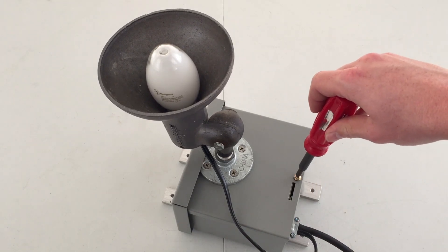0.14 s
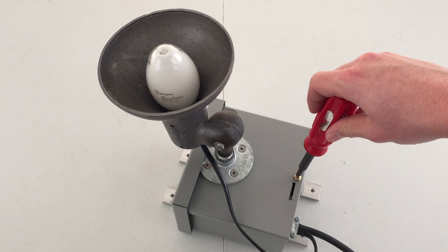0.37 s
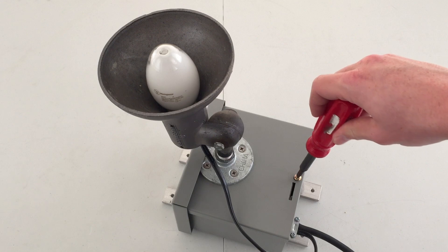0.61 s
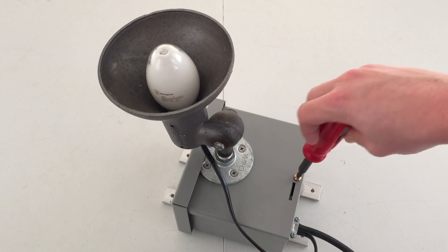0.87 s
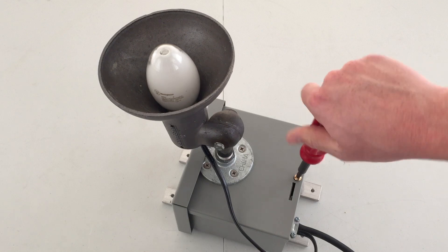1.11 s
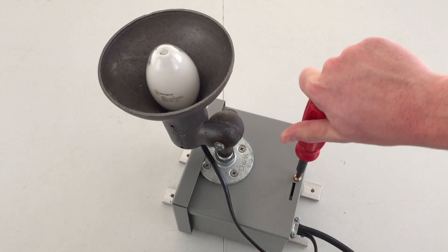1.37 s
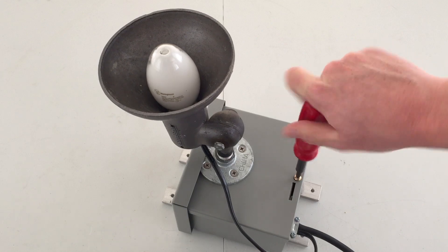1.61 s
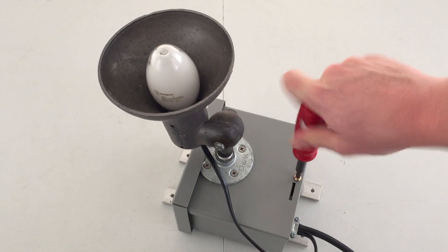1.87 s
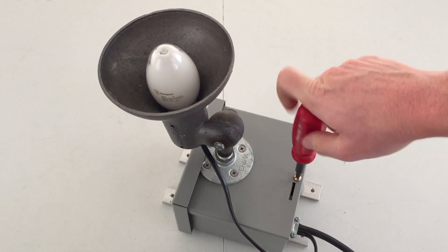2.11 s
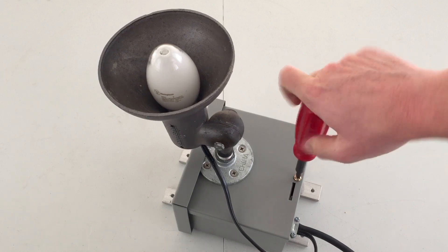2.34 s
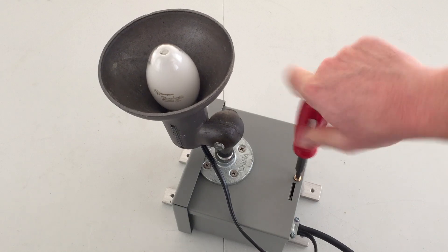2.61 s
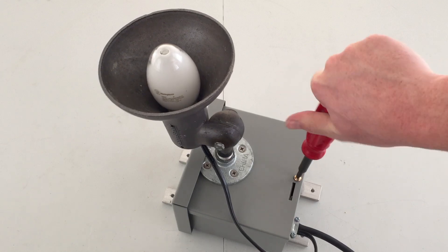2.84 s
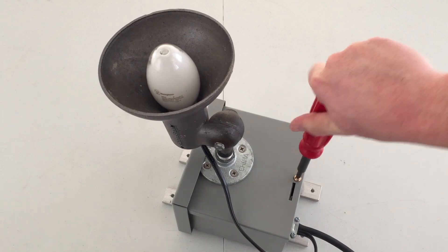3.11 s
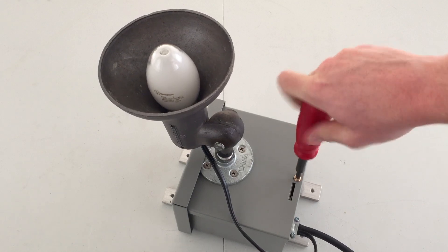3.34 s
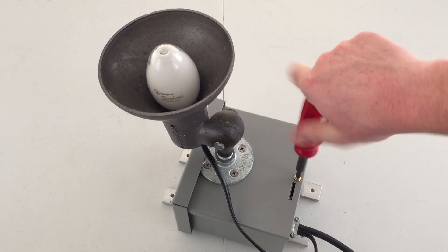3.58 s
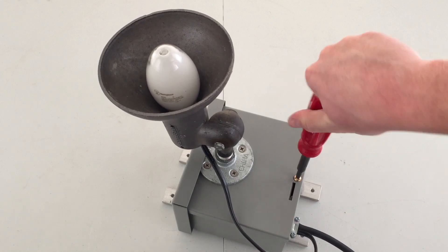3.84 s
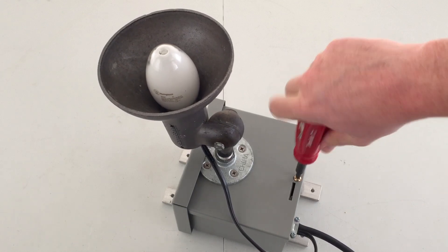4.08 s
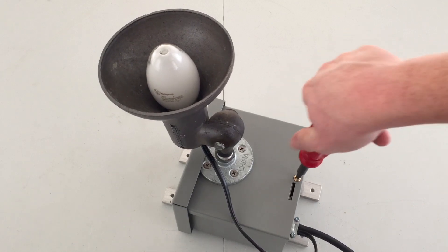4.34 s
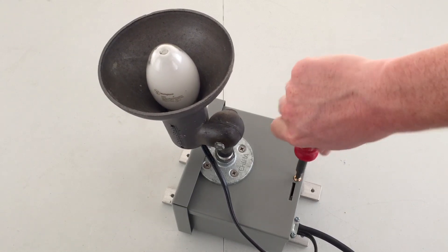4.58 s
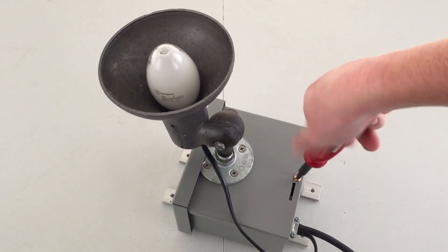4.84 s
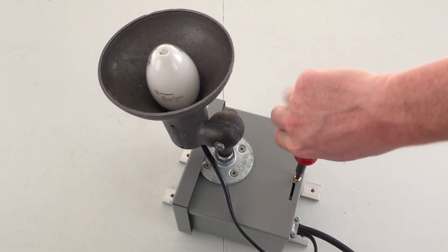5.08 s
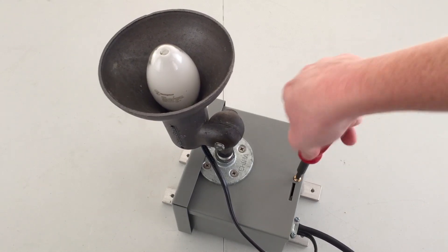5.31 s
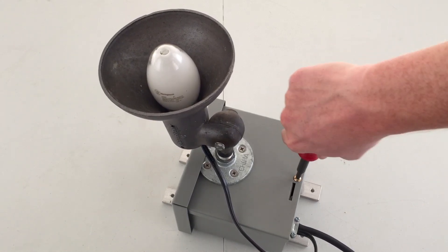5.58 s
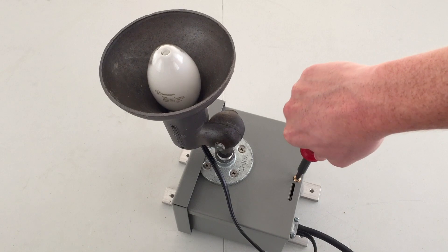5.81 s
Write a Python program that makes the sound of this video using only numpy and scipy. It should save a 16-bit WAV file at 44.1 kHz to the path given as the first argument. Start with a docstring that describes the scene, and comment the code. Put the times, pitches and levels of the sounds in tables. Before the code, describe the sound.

Close metallic ticks and dull knocks from a screwdriver blade ring a metal box briefly; one sharp clack stands out midway over soft handling rumble.

```python
"""A screwdriver turns a screw in the cover of a sheet-metal box on a table, close to a small microphone.
The blade's knocks are bursts of tiny contacts that ring the box's modes and a dense, dying noise tail;
the thread grinds as grains that drive the same modes. The hand's push shakes box, cover and table top
through low resonances, its lean sways the table as deep noise, and fingers slide on the handle as grainy
hiss. Below lies the tone of a quiet hard-walled room, low hum and microphone hiss, as banded noise."""
import sys
import numpy as np
from scipy import signal
from scipy.fft import rfft
from scipy.io import wavfile

SR = 44100
rng = np.random.default_rng(int(sys.argv[2]) if len(sys.argv) > 2 else 0)


def transcribe(u):
    """Save the signal u as a 16-bit wav file named by the first command-line argument.

    u: samples, shape (n,) or (channels, n), limited to [-1, 1]; the rate is SR.
    q: integer samples, one column per channel.
    """
    v = np.clip(np.atleast_2d(u).T, -1, 1)
    q = np.round(v * 32767).astype(np.int16)
    wavfile.write(sys.argv[1], SR, q)


def field_ratio(decibels):
    """Amplitude ratio for a level in dB (20 dB per decade); scalars and array-likes work."""
    return 10 ** (np.asarray(decibels, dtype=float) / 20)


N = 262086

# Colour of the room tone. Each row: frequency in Hz, relative level in dB per Hz.
ROOM_COLOUR = [(18, -37), (30, -7.5), (199, -2), (259, -13.5), (404, 1.5), (486, -22.5), (684, -11),
               (866, -19), (988, -10.5), (1190, -15), (2750, -20.5), (13000, -34.5), (16000, -39.5)]
ROOM_DB = -72   # rms level of the whole room tone

# Resonances of the table top. Each row: frequency in Hz, nominal width in Hz, relative level in dB.
TABLE_TOP_MODES = [(88, 39, -9.5), (121, 18, -4)]
TOP_LEAN_SHARE, TOP_DB = 0.36, 5.5   # share of the lean's dB, the push giving the rest; added dB

# Fingers slip on the handle. Each row: start in seconds, hold in seconds, relative level in dB,
# pitch of the hiss in Hz.
FINGER_SLIPS = [(0.69, 0.066, -71, 9000), (1.096, .03, -85, 9500), (1.41, .02, -82, 9000),
                (1.71, 0.019, -72.5, 11700), (1.958, .02, -80, 12400), (2.252, 0.043, -80, 8700),
                (2.504, 0.037, -87, 8960), (2.574, 0.009, -71, 9400), (2.693, 0.0048, -64, 13900),
                (2.864, 0.006, -69.5, 13800), (3.135, .02, -78, 12000), (3.45, .02, -77.5, 12000),
                (3.552, 0.12, -72.5, 8000), (3.842, 0.014, -71, 12000), (3.9, 0.024, -74.5, 6900),
                (4.027, .03, -85.5, 9040), (4.292, .02, -81, 9000), (4.397, .01, -74.5, 12000),
                (4.475, .01, -81, 12500), (4.767, 0.053, -85.5, 10200), (5.22, .11, -86, 8800)]
SLIP_RISE_DB_PER_S, SLIP_FALL_DB_PER_S = 1496.5, 702
SKIN_DB = -95   # resting level of each band between slips
SLIP_DB_PER_OCTAVE = 21   # loss away from the pitch

# The hand between pushes. Each row: time in seconds, relative grip on the handle in dB,
# relative weight on the table in dB.
HAND_REST = [(0.0, -68, -91), (0.96, -59, -81), (1.42, -72.5, -73), (1.85, -65, -77.5),
             (2.28, -66.5, -75.5), (2.84, -63, -65), (3.24, -64, -83), (3.62, -65.5, -74.5),
             (4.8, -65.5, -76.5), (5.94, -59.5, -83)]
GRIP_PUSH_DB, GRIP_FLEX_DB = -1.5, -9   # from the grip to the resting push and flexing

# The hand bears down. Each row: start in seconds, hold in seconds, relative push on the box in dB,
# relative flexing of the cover in dB, relative lean on the table in dB.
HAND_PUSHES = [(0.215, 0.0094, -50, -54, -83), (0.38, 0.018, -71, -62.5, -79),
               (0.672, 0.0055, -48, -49.5, -87), (0.757, 0.033, -59, -75, -83),
               (0.893, 0.017, -44.5, -49, -67), (1.048, 0.018, -54, -71, -69),
               (1.419, 0.013, -55.5, -61.5, -66), (1.682, 0.0067, -46, -51, -69),
               (1.79, 0.017, -61.5, -66, -63), (1.971, 0.051, -54.5, -65, -81),
               (2.571, 0.034, -52.5, -56, -58.5), (2.696, 0.053, -61.5, -75, -65),
               (2.895, 0.042, -43.5, -48.5, -56.5), (2.984, 0.027, -49, -56.5, -63),
               (3.124, .04, -56.5, -63.5, -63), (3.406, 0.052, -55.5, -83, -65),
               (3.509, 0.056, -53.5, -53.5, -64), (3.59, 0.033, -66, -59.5, -60),
               (3.854, 0.019, -51, -53.5, -56.5), (3.889, 0.012, -56.5, -65, -52),
               (3.991, .02, -61.5, -75, -70), (4.18, 0.029, -60.5, -62.5, -77), (4.316, .02, -47, -48, -51),
               (4.376, 0.023, -48, -60, -60), (4.566, 0.037, -63, -56.5, -67),
               (4.763, 0.046, -54.5, -61, -66.5), (4.936, 0.018, -63.5, -74.5, -64),
               (4.98, 0.024, -64, -72, -78), (5.114, 0.019, -47, -56.5, -80.5),
               (5.305, 0.023, -48, -57, -68.5), (5.438, 0.037, -53, -80, -78.5),
               (5.47, 0.013, -50, -47.5, -77), (5.594, 0.029, -58, -68, -77.5),
               (5.705, 0.045, -57, -62, -79.5), (5.876, 0.031, -52.5, -59.5, -81.5)]
PUSH_RISE_DB_PER_S, PUSH_FALL_DB_PER_S, LEAN_LAG_S = 451.5, 263.5, .025

# Low resonances of the box walls. Each row: frequency in Hz, nominal width in Hz, relative level in dB.
WALL_MODES = [(158.8, 8, -4.5), (207.2, 9.7, 1)]

# Low resonances of the cover. Each row: frequency in Hz, nominal width in Hz, relative level in dB.
COVER_MODES = [(297.5, 12, -2.5), (342.7, 30, -8), (405.4, 15, -3), (530, 56, -9)]

# The thread binds, grinds harder and lets go. Each row: letting go in seconds, hold before it in seconds,
# relative level in dB.
THREAD_BINDS = [(0.02, 0.033, -67), (0.653, .012, -57), (0.913, 0.0071, -41), (1.43, .03, -59.5),
                (1.686, .02, -57), (1.88, .015, -72), (2.29, 0.11, -60), (2.512, .015, -63),
                (2.578, 0.0069, -44), (2.89, 0.032, -49), (3.33, 0.045, -70), (3.49, .012, -48.5),
                (3.663, 0.11, -46.5), (3.89, .02, -54), (3.841, 0.035, -54.5), (4.218, .18, -64),
                (4.53, 0.057, -60.5), (4.704, 0.039, -69), (5.142, 0.013, -52.5), (5.94, 0.51, -58.5)]
BIND_RISE_DB_PER_S, BIND_FALL_DB_PER_S = 354.5, 697
THREAD_DB = -69   # relative level of the steady grinding

# Modes of box and cover. Each row: frequency in Hz, relative level in dB, time to fall 60 dB in seconds.
BOX_MODES = [(648, -15, 0.25), (713, -14, 0.22), (763.7, -7.5, 0.24), (816.4, -8, 0.21),
             (877.4, -5.5, 0.12), (924.7, -11.5, 0.13), (1056, -14, 0.24), (1150, -3, 0.15),
             (1255.6, -6.5, 0.18), (1290, -7, 0.13), (1380, -15, 0.35), (1548, -14, 0.24),
             (1690, -11, 0.24), (1851, -13, 0.19), (1960, -12, 0.29), (2164, -4, 0.16), (2330, 0, 0.12),
             (2455, -6, .2), (2578, -7.5, 0.11), (3150, -19, 0.18), (3190, -8.5, 0.14), (3280, -7.5, 0.22),
             (3386, -7, 0.1), (3626, -4.5, 0.3), (3750, -7.5, .13), (4046, -8, 0.31), (4160, -9, 0.12),
             (4190, -15, 0.14), (5270, -7.5, 0.19), (5480, -26.5, .12)]

# The sheet's crowd of small modes and the room's echoes. Each row: frequency in Hz, relative level in dB,
# time to fall 60 dB in seconds.
TAIL_BANDS = [(300, -7, 0.46), (605, -10.5, 0.47), (1030, -15, 0.47), (1722, -8.5, 0.09), (2850, -8, 0.39),
              (4400, -2.5, 0.28), (7360, -6, .22), (13110, -6.5, 0.11)]

# Blade knocks, passed on to the box. Each row: start in seconds, relative levels in dB at 800, 1400 and
# 3000 Hz, pitch that rings most in Hz.
BLADE_KNOCKS = [(0.21, -49.5, -56, -56.5, 838), (0.379, -43.5, -64, -71.5, 2140), (0.4, -64, -72, -82, 780),
                (0.425, -56, -78, -78, 790), (0.651, -58, -46, -55, 1960), (0.659, -36.5, -34, -50, 1290),
                (0.678, -42, -35, -52, 1960), (0.692, -39, -43.5, -62, 1290), (0.71, -44, -50, -58, 755),
                (0.886, -61, -51, -52, 1260), (0.896, -38, -49.5, -49, 1240), (0.908, -43, -42, -51, 2330),
                (1.032, -72, -62, -63, 1960), (1.044, -72, -55.5, -58, 2360), (1.053, -57, -65, -72, 3386),
                (1.272, -51, -72, -89, 870), (1.315, -62, -75, -79, 867), (1.399, -69, -63, -73, 1390),
                (1.674, -55, -74, -60, 1260), (1.719, -50, -56, -61.5, 810), (1.802, -50.5, -61, -75, 762),
                (1.933, -62, -57, -78, 886), (1.987, -56, -67, -69, 800), (2.233, -54, -81, -81, 1160),
                (2.533, -53.5, -77, -73, 880), (2.591, -41, -50, -63, 795), (2.733, -52, -65, -81, 875),
                (2.771, -55.5, -54, -75, 840), (2.794, -43.5, -68, -63, 810), (2.868, -43, -51, -61.5, 820),
                (2.884, -63, -50, -58.5, 754), (2.909, -33, -29, -34, 1960),
                (2.933, -35.5, -36, -47.5, 774), (2.965, -40, -36, -58, 1870), (3.02, -53, -47, -63, 1400),
                (3.089, -46, -52, -67, 724), (3.154, -47.5, -56.5, -72, 796),
                (3.509, -24.5, -23.5, -25.5, 3220), (3.516, -32, -31.5, -29.5, 4046),
                (3.833, -32.5, -34.5, -46.5, 1430), (3.899, -60.5, -72, -66, 783),
                (4.079, -59, -57, -88.5, 1370), (4.178, -40.5, -41.5, -53, 1010),
                (4.222, -43, -47.5, -61.5, 1110), (4.244, -54.5, -54, -59.5, 764),
                (4.306, -46, -59, -72, 713), (4.317, -38.5, -48.5, -66.5, 934),
                (4.344, -50, -58, -80, 1153), (4.373, -61, -54, -70, 626), (4.563, -51, -56, -69, 830),
                (4.58, -42, -50, -52, 910), (4.672, -45, -66, -67, 665), (4.72, -51, -69, -62, 740),
                (4.754, -40, -54.5, -61.5, 1100), (4.774, -64, -72, -66.5, 846),
                (4.799, -50, -55.5, -69, 1190), (4.931, -51.5, -63.5, -68.5, 1145),
                (5.122, -51, -65, -70, 642), (5.147, -47.5, -53, -61, 2520), (5.213, -46, -57, -61.5, 876),
                (5.24, -46, -64, -73, 1056), (5.312, -52.5, -52.5, -67.5, 793),
                (5.464, -27.5, -40.5, -57.5, 913), (5.477, -38.5, -54.5, -56, 918)]
KNOCK_TREBLE_DB = -17   # 7500 Hz against 3000 Hz

# The blade's hard edge ticks on the screw head. Each row: start in seconds, relative level at 7500 Hz in dB.
EDGE_TICKS = [(0.21, -43), (0.658, -32.5), (0.884, -61), (0.895, -56), (1.045, -67), (1.049, -65),
              (1.139, -73), (1.4, -67.5), (1.802, -74), (2.233, -73), (3.509, -22), (3.834, -58.5),
              (3.899, -64), (4.178, -72), (4.317, -67), (4.47, -66), (4.563, -71.5), (4.72, -68.5),
              (4.756, -64), (4.932, -72.5), (5.464, -70)]
TICK_MID_DB, TICK_LOW_DB = -15.5, -44.5   # 3000 Hz, and 800 and 1400 Hz, against 7500 Hz
TICK_HZ = 5930   # pitch that rings most

# Points of a contact's colour. Each entry: frequency in Hz.
COLOUR_HZ = [400, 800, 1400, 3000, 7500, 16000]


def rms_one(x):
    """Scales a signal to rms 1."""
    return x / np.sqrt(np.mean(x ** 2) + 1e-20)


def at_hz(hz, points_hz, values):
    """Reads a curve drawn over log frequency."""
    return np.interp(np.log(hz), np.log(points_hz), values)


def band(x, low_hz, high_hz):
    """Keeps the band between two frequencies."""
    return signal.sosfilt(signal.butter(2, [low_hz, high_hz], "band", fs=SR, output="sos"), x)


def ring(force, hz, t60):
    """A damped mode: a unit click sets a sine with starting height 1 ringing."""
    radius = field_ratio(-60 / (t60 * SR))
    turn = 2 * np.pi * hz / SR
    return signal.lfilter([0, np.sin(turn)], [1, -2 * radius * np.cos(turn), radius * radius], force + 1e-18)


def grains(per_s, spread_db):
    """Rough surfaces catch at random: clicks of uneven size and either sign; rms 1."""
    sizes = field_ratio(spread_db * np.minimum(rng.exponential(1, N), 5)) * rng.choice([-1, 1], N)
    return rms_one(sizes * (rng.random(N) < per_s / SR))


def swells(start, hold, db, rise_db_per_s, fall_db_per_s, rest_db):
    """Level in dB of gestures that rise, hold and fall away over a resting level."""
    t, power = np.arange(0, N, 64) / SR, 0
    for s, length, top_db in zip(start, hold, db):
        rise_db = rise_db_per_s * np.maximum(s - t, 0)
        fall_db = fall_db_per_s * np.maximum(t - s - length, 0)
        power = power + field_ratio(2 * (top_db - rise_db - fall_db))
    return 10 * np.log10(np.interp(np.arange(N) / SR, t, power) + field_ratio(2 * rest_db))


def shaken(resonances, level_db, shove):
    """Low resonances of a body answer an uneven shove whose level follows the hand."""
    driven, out = field_ratio(level_db) * shove, 0
    for k, (hz, width, db) in enumerate(resonances):
        evened = field_ratio(db - 4) / np.std(ring(shove, hz, 2.3 / width))
        out = out + (-1) ** k * evened * ring(driven, hz, 2.14 / width)
    return out


def room_tone():
    """Low room hum and microphone hiss: steady noise in half-octave bands."""
    white, out = rng.standard_normal((2, N)), 0
    edges = 25 * 2 ** np.arange(0, 9.6, .5)
    for k, (low, high) in enumerate(zip(edges, edges[1:])):
        level_db = at_hz(np.sqrt(low * high), *np.transpose(ROOM_COLOUR))
        out = out + field_ratio(level_db) * band(white[k % 2], low, high)   # neighbours are independent
    return field_ratio(ROOM_DB) * rms_one(out)


def table(lean_db):
    """The hand's weight makes the table sway: deep noise that follows the lean."""
    white = rng.standard_normal(N)
    return band(field_ratio(lean_db) * white, 30, 65) / np.std(band(white, 34, 70))


def fingers():
    """Skin on plastic: a grainy hiss, loudest in the bands near each slip's pitch."""
    s, hold, db, pitch_hz = np.transpose(FINGER_SLIPS)
    skin, out = grains(3000, spread_db=3.5), 0
    edges = 4500 * 2 ** np.arange(0, 2.1, 1 / 3)
    for low, high in zip(edges, edges[1:]):
        near_db = db - SLIP_DB_PER_OCTAVE * abs(np.log2(np.sqrt(low * high) / pitch_hz))
        level_db = swells(s, hold, near_db, SLIP_RISE_DB_PER_S, SLIP_FALL_DB_PER_S, SKIN_DB)
        out = field_ratio(level_db) * rms_one(band(skin, low, high)) - out   # signs alternate so that bands join
    return out


def hand_levels():
    """The hand bears down over its resting grip: levels in dB of push, flexing and lean."""
    s, *columns = np.transpose(HAND_REST)
    grip_db, weight_db = [np.interp(np.arange(N) / SR, s, c) for c in columns]
    s, hold, push, flex, lean = np.transpose(HAND_PUSHES)
    pace = PUSH_RISE_DB_PER_S, PUSH_FALL_DB_PER_S
    push_db = swells(s, hold, push, *pace, grip_db + GRIP_PUSH_DB)
    flex_db = swells(s, hold, flex, *pace, grip_db + GRIP_FLEX_DB)
    lean_db = swells(s + LEAN_LAG_S, hold, lean, *pace, weight_db)
    return push_db, flex_db, lean_db


def thread_grind():
    """The thread grinds as a stream of grains, harder wherever it binds."""
    s, hold, db = np.transpose(THREAD_BINDS)
    grind_db = swells(s - hold, hold, db, BIND_RISE_DB_PER_S, BIND_FALL_DB_PER_S, THREAD_DB)
    return field_ratio(grind_db - 31.0) * band(grains(300, spread_db=5.5), 460, 1490)


def box(force, grind):
    """Knocks and grinding drive the same modes; each mode takes only the force near its pitch."""
    out = 0
    for hz, db, t60 in BOX_MODES:
        drive = band(force(hz, evened=True) + grind, hz / 1.315, hz * 1.47)
        out = out + field_ratio(db - 8) * ring(drive, hz, t60)
    return out


def tail(force, crack_db, tail_db):
    """Small modes and room echoes: in each band the bare contact, then noise that dies away."""
    out, t = 0, np.arange(SR // 2) / SR
    edges = 280 * 2 ** np.arange(0, 5.9, 1 / 3)
    tail_hz, colour_db, t60s = np.transpose(TAIL_BANDS)
    for low, high in zip(edges, edges[1:]):
        hz = np.sqrt(low * high)
        answer = field_ratio(tail_db - 60 * t / at_hz(hz, tail_hz, t60s)) * rng.standard_normal(len(t))
        answer[0] += field_ratio(crack_db)
        answer = band(answer, low, high)
        answer = band(answer, low / 1.24, min(high * 1.215, .45 * SR)) * np.sqrt(SR / hz)
        out = out + field_ratio(at_hz(hz, tail_hz, colour_db)) * signal.fftconvolve(force(hz), answer)[:N]
    return out


def knock_force(bass_db, treble_db, chatter_ms, favour_db):
    """Blade in the slot: each knock is a swelling, dying chatter of tiny contacts with its own colour.

    Returns a function that gives the force of all knocks and ticks near a pitch."""
    contacts = [(s, low, mid, high, high + KNOCK_TREBLE_DB, hz) for s, low, mid, high, hz in BLADE_KNOCKS]
    contacts += [(s, db + TICK_LOW_DB, db + TICK_LOW_DB, db + TICK_MID_DB, db, TICK_HZ)
                 for s, db in EDGE_TICKS]
    s, *levels_db, favoured_hz = np.transpose(contacts)
    colours = np.transpose([levels_db[0] + bass_db, *levels_db, levels_db[-1] + treble_db])
    length = 2500   # samples
    step = np.arange(length)
    age = step / (chatter_ms * SR / 1000)
    # bright knocks are steel on steel and start at once, dull ones are slips that swell
    brightness_db = np.max(levels_db[2:], axis=0) - levels_db[0]
    suddenness = np.clip(13.0 * field_ratio(brightness_db + 16.0), 4.0, 300)
    swell = 1 - np.exp(-suddenness[:, None] * age)
    chatter = rng.standard_normal((len(s), length)) ** 3 * swell * np.exp(-age)
    chatter /= np.sqrt(np.sum(chatter ** 2, axis=1, keepdims=True))
    at = (s * SR).astype(int)[:, None] + step
    power = abs(rfft(chatter)) ** 2
    bin_hz = np.arange(length // 2 + 1) * SR / length

    def near(hz, evened=False):
        """Sums the contacts, each weighted by its colour at this pitch."""
        gains = field_ratio([at_hz(hz, COLOUR_HZ, colour) for colour in colours])
        # where and how the blade bears picks out the modes near one pitch
        closeness = np.exp(-(np.log2(hz / favoured_hz) / .09) ** 2)
        gains = gains * field_ratio(favour_db * (1 if evened else .4) * closeness)
        if evened:   # every knock reaches a mode, however its contacts fall in the cycle
            gains = gains / np.maximum(abs(chatter @ np.exp(-2j * np.pi * hz * step / SR)), .5)
        else:   # and every band
            nearby = (bin_hz > hz / 1.15) & (bin_hz < hz * 1.15)
            gains = gains / np.sqrt(power[:, nearby].mean(axis=1))
        return np.bincount(at.ravel(), (chatter * gains[:, None]).ravel(), N + length)[:N]
    return near


def scene():
    """Sums the room, the table, the hand and the metal, in one channel."""
    push_db, flex_db, lean_db = hand_levels()
    top_db = TOP_DB + TOP_LEAN_SHARE * lean_db + (1 - TOP_LEAN_SHARE) * push_db
    shove = grains(1500, spread_db=3.0)   # one shove moves walls, cover and table top
    background = room_tone() + table(lean_db) + shaken(TABLE_TOP_MODES, top_db, shove)
    force = knock_force(bass_db=-19.0, treble_db=-13.0, chatter_ms=4.74, favour_db=11)
    metal = box(force, thread_grind()) + tail(force, crack_db=25.0, tail_db=-7.5)
    metal = metal + shaken(WALL_MODES, push_db, shove) + shaken(COVER_MODES, flex_db, shove)
    return (background + fingers() + metal)[None]


def roll_off(x):
    """The treble ends steeply here."""
    return signal.sosfilt(signal.butter(12, 16470, fs=SR, output="sos"), x)


def record(dry):
    """A small microphone that loses the deepest bass."""
    heard = signal.sosfilt(signal.butter(4, 36, "high", fs=SR, output="sos"), dry)
    return roll_off(heard)


dry = scene()
out = record(dry)
transcribe(out)
```